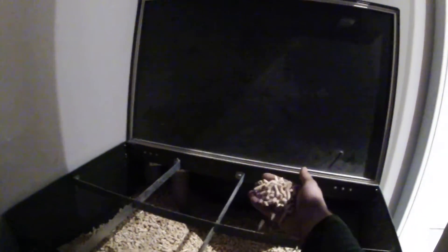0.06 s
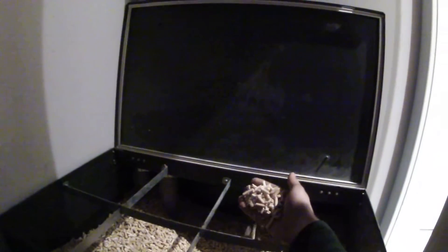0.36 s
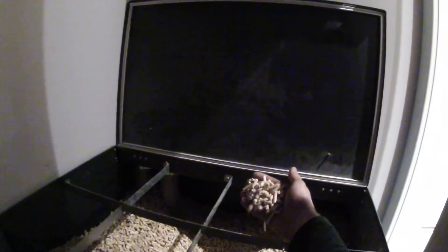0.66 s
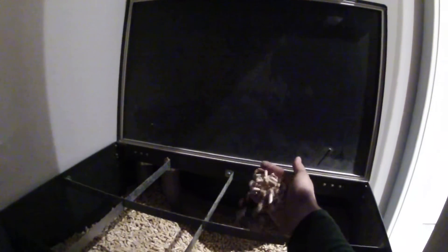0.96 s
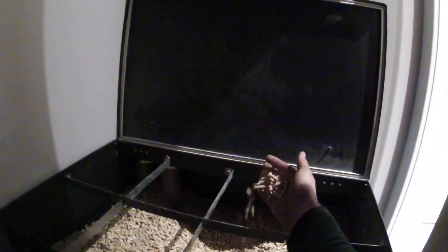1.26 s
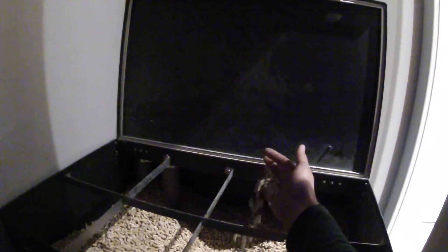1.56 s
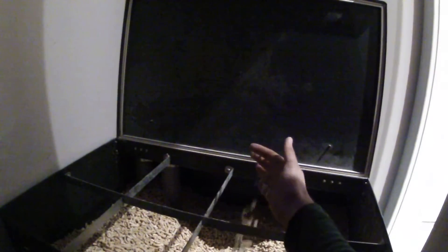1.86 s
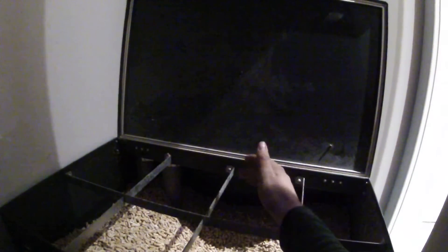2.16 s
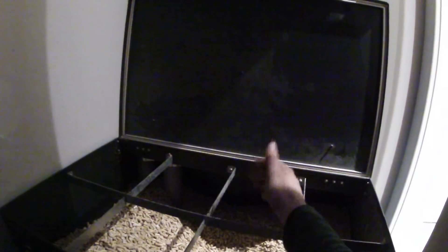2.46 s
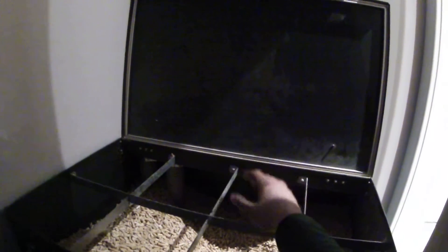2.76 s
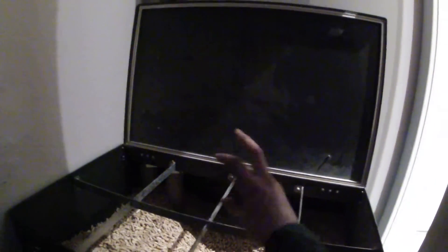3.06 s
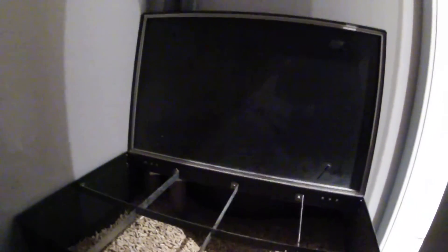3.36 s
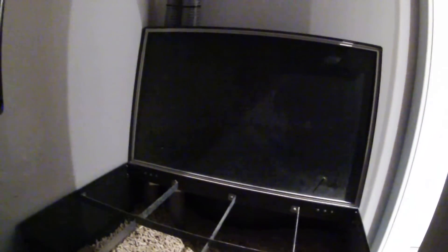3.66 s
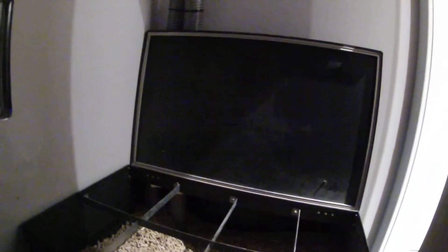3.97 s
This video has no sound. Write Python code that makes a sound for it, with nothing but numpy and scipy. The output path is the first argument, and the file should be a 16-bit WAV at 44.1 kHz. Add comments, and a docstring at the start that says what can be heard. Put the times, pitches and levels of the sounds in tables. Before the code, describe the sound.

Close up in a room, wood pellets drop into a metal hopper with light, bright clicks that thicken and then thin out. Afterwards a sleeve rustles with a soft knock, over dull handling bumps and steady low background noise.

```python
"""At a stove's steel hopper, wood pellets slide off a hand onto the heap: single ones first,
then the whole handful, then stragglers. Each one clicks and bounces among a patter of lighter
pellets, and the steel walls answer with a short bright echo. A sleeve rustles and a soft knock
sounds as the arm withdraws. Underneath are dull handling bumps, a low room rumble, a soft rush,
a faint whine and hiss."""
import sys
import numpy as np
from scipy import signal
from scipy.fft import rfft, irfft
from scipy.io import wavfile

SR = 44100
rng = np.random.default_rng(int(sys.argv[2]) if len(sys.argv) > 2 else 0)


def to_wav(sig):
    """Store sig (one row per channel, or 1-D mono) as 16-bit WAV at the path in sys.argv[1].

    Samples outside -1..1 are clipped; the rate is SR.
    """
    pcm = np.clip(np.atleast_2d(sig), -1, 1) * 32767
    pcm = np.round(pcm).astype(np.int16)
    wavfile.write(sys.argv[1], SR, pcm.T)  # frames by channels


N = 176400
T = np.arange(N) / SR

# The room's rumble over time. Each row: time in seconds, level in dB.
RUMBLE_LEVELS = [(0, -51), (0.2, -58.5), (0.9, -57.5), (1.25, -56), (1.55, -60), (1.8, -52.5), (2.1, -54.5),
                 (2.3, -58), (3.0, -62), (3.45, -58.5), (3.56, -53.5), (3.7, -55.5), (4, -57.5)]
# The rumble's tone. Each row: frequency in Hz, gain in dB.
RUMBLE_COLOUR = [(20, -4), (45, 5), (70, -1.5), (115, -1.5), (165, -7), (230, -5), (330, -11), (500, -19),
                 (800, -41), (2000, -44.5)]
# The whine's swells. Each row: time in seconds, level in dB relative to its loudest.
WHINE_LEVELS = [(0, -12), (0.27, 0), (0.8, -3), (1.5, 0), (1.7, -16), (3.05, -36), (3.15, -0.5),
                (3.22, -35)]
# The whine's resonances. Each row: frequency in Hz, half-width in Hz, gain in dB.
WHINE_PEAKS = [(1090, 54, -12.5), (1440, 30, -8), (1700, 32, 0.5)]
# The soft rush over time. Each row: time in seconds, relative level in dB.
RUSH_LEVELS = [(0, -62), (0.76, -63), (0.79, -52.5), (0.825, -63.5), (1.15, -62), (1.36, -57), (1.65, -64),
               (1.8, -63.5), (2.15, -69), (2.4, -78.5)]
# The tones of the rush and the hiss. Each row: frequency in Hz, gain in dB.
RUSH_COLOUR = [(200, -4), (600, -5), (1000, 0.5), (1900, -2), (2400, -10), (4000, -16), (12000, -30.5)]
HISS_COLOUR = [(600, -20), (800, -5.5), (2390, -5.5), (10500, -8.5), (12500, -3), (15000, -11)]
# Pellets hitting the heap. Each row: start in seconds, relative level in dB, ring pitch in Hz,
# brightness in dB per octave.
LANDINGS = [(0.027, -41.5, 10800, 1.5), (0.118, -50, 13300, -0.5), (0.175, -50.5, 7400, -1),
            (0.19, -49, 10200, 1.5), (0.3269, -50.5, 6600, -3.0), (0.3651, -40.5, 8600, 0),
            (0.403, -52.5, 7200, -3.5), (0.4366, -45.5, 12400, 0.5), (0.5392, -47.5, 12400, 1),
            (0.5795, -47.5, 11500, 0.0), (0.598, -48.5, 11500, 0), (0.612, -47.5, 11400, -1),
            (0.643, -42, 7540, 0.5), (0.6655, -44, 11300, 0.5), (0.7347, -47.3, 7000, 2.5),
            (0.85, -48, 10400, -1), (0.9981, -39.5, 7200, 1), (1.052, -44.5, 12900, 1.5),
            (1.085, -41.5, 3440, 2), (1.116, -47.5, 8300, 1), (1.146, -48, 7600, -3),
            (1.167, -43, 12400, -1), (1.2055, -47, 10300, -0.5), (1.228, -41.5, 3350, -3),
            (1.2703, -49, 8000, -3), (1.2765, -43, 12000, -1.5), (1.286, -43.5, 10000, 1),
            (1.3, -40.5, 11000, 1.5), (1.3335, -41, 7100, 4), (1.3499, -42, 7450, -2),
            (1.3875, -43, 4460, 1), (1.4354, -46.5, 9000, -3), (1.461, -41.5, 11200, 0.5),
            (1.4688, -42.5, 4100, 1.5), (1.5031, -46, 12900, 3), (1.541, -44.5, 6110, -1.5),
            (1.596, -47.5, 11400, -2), (1.627, -47.5, 8400, 1), (1.6814, -43.5, 8300, 0),
            (1.696, -44, 11000, 2), (1.72, -40, 6200, 0), (1.742, -43.5, 5860, -2.5), (1.759, -40, 9500, 3),
            (1.7697, -44, 12000, -1), (1.8312, -47, 12900, 0.5), (1.8533, -37, 9300, -0.5),
            (1.8922, -38.5, 12100, -0.5), (1.9093, -47, 12400, -1.5), (1.95, -42, 4200, 2),
            (1.963, -47.5, 4300, -1), (1.9917, -40.5, 9000, 1), (2.0092, -45.5, 6900, -3),
            (2.0364, -43, 3600, 0), (2.049, -43, 4100, 3.5), (2.0595, -47.5, 4480, -3),
            (2.0851, -42.5, 4100, 5), (2.093, -45.5, 9100, -3), (2.129, -45.5, 9800, -1.5),
            (2.136, -43.5, 10040, 0), (2.143, -47.5, 11000, 0), (2.219, -49.5, 10900, -3.5),
            (2.2532, -50.5, 8050, -4), (2.274, -46.5, 4970, -1.5), (2.3238, -40, 9100, -2),
            (2.4855, -48.5, 5200, -2.5)]
# The flow of lighter pellets. Each row: time in seconds, relative level in dB.
PATTER_LEVELS = [(0.1, -71), (0.5, -73), (0.56, -62), (0.62, -64), (0.72, -79), (0.98, -68.5), (1.1, -58.5),
                 (1.25, -57), (1.31, -48.5), (1.42, -53.5), (1.53, -54), (1.65, -55.5), (1.76, -47),
                 (1.81, -54), (1.97, -54), (2.05, -52.5), (2.18, -60.5), (2.27, -59), (2.31, -80)]
# The tone of all pellet clicks. Each row: frequency in Hz, gain in dB.
CLICK_COLOUR = [(60, -14), (160, -1.5), (260, -8), (500, -15), (1000, -11.5), (2000, -6), (3500, -1.5),
                (6000, -2.5), (8000, -1), (12000, 3), (15000, -0.5)]
# Handling bumps. Each row: middle in seconds, relative level in dB.
BUMPS = [(0.107, -48.5), (0.266, -56.5), (0.501, -55.5), (0.627, -48), (0.707, -50), (0.983, -53.5),
         (1.074, -55), (1.21, -53.5), (1.29, -53.5), (1.367, -53.5), (1.458, -54.5), (1.567, -51.5),
         (1.637, -52), (1.693, -53.5), (1.95, -49), (2.041, -48.5), (2.162, -48.5), (2.235, -54),
         (2.352, -52.5), (2.5, -52.5), (2.613, -57), (2.717, -56.5), (2.928, -54), (3.323, -54.5),
         (3.401, -53), (3.55, -52.5), (3.61, -50.5), (3.715, -53), (3.803, -56)]
# The tones of the handling bumps and ticks. Each row: frequency in Hz, gain in dB.
BUMP_COLOUR = [(30, -8), (70, -2.5), (120, 2.5), (170, -4), (230, -5), (330, -14.5), (600, -24), (900, -30),
               (2000, -51.5)]
TICK_COLOUR = [(100, -13), (380, 1.5), (700, 0), (1000, -17), (2500, -38.5)]
# The sleeve's rustle. Each row: time in seconds, level in dB.
RUSTLE_LEVELS = [(3.05, -70), (3.24, -62.5), (3.33, -65.5), (3.48, -60.5), (3.61, -57), (3.68, -59.5),
                 (3.77, -59.5), (3.98, -63.5)]
# Brief brushes of the sleeve. Each row: middle in seconds, width in seconds, relative level in dB.
BRUSHES = [(3.24, 0.037, -57), (3.62, 0.21, -62.5)]
# The tones of the rustle and the brushes. Each row: frequency in Hz, gain in dB.
RUSTLE_COLOUR = [(100, -12), (300, -5), (700, -1.5), (1900, -5), (2600, -13.5), (6000, -20), (15000, -11)]
BRUSH_COLOUR = [(500, -17), (2000, 2.5), (5000, -2.5), (10000, -1), (15000, -10)]
# The knock's ringing tones. Each row: pitch in Hz, relative level in dB, seconds to fade by 60 dB.
KNOCK_TONES = [(1020, 1.5, 0.053), (1290, -2, 0.043), (1390, 10, 0.021), (1560, -2, .04), (1825, -5, .04),
               (2090, -0.5, 0.036)]


def undb(db):
    """Turn decibels into a gain."""
    return 10 ** (np.asarray(db) / 20)


def unit(x):
    """Scale to an average (rms) level of 1."""
    return x / np.sqrt(np.mean(x ** 2))


def unit_energy(x):
    """Scale each channel to an energy of 1."""
    return x / np.sqrt(np.sum(x ** 2, axis=-1, keepdims=True))


def curve(rows):
    """A gain over time that joins (seconds, dB) points."""
    return undb(np.interp(T, *np.array(rows).T))


def swell(at_s, width_s):
    """A bell-shaped rise and fall around one moment."""
    return np.exp(-.5 * ((T - at_s) / width_s) ** 2)


def colour(x, points):
    """Shape a sound's tone with a filter that follows (Hz, dB) points."""
    hz, db = np.array(points).T
    size = 2 * N
    freqs = np.maximum(np.fft.rfftfreq(size, 1 / SR), 1)
    gains = undb(np.interp(np.log(freqs), np.log(hz), db))
    cepstrum = irfft(np.log(gains))
    cepstrum[1:N] *= 2  # folded so the filter rings after a click, never before it
    cepstrum[N + 1:] = 0
    return irfft(rfft(x, size) * np.exp(rfft(cepstrum)))[..., :N]


def noise(points, side_db):
    """Stereo noise with the given tone; a higher side_db sounds wider."""
    mid, side = rng.standard_normal((2, N))
    return unit(colour(mid + undb(side_db) * side * np.array([[1], [-1]]), points))


def add(track, at_s, sound):
    """Mix a short sound into a track."""
    start = int(np.clip(at_s * SR, 0, track.shape[-1] - 1))
    part = sound[..., :track.shape[-1] - start]
    track[..., start:start + part.shape[-1]] += part


def room(whine_db=-69.5, hiss_db=-60.5):
    """A low rumble, a thin whine of noise in narrow resonances, a midrange rush and even hiss."""
    rumble = noise(RUMBLE_COLOUR, side_db=-7.5) * curve(RUMBLE_LEVELS)
    freqs = np.fft.rfftfreq(N, 1 / SR)
    peaks = sum(undb(db) / (1 + ((freqs - hz) / width) ** 2) for hz, width, db in WHINE_PEAKS)
    whine = unit(irfft(rfft(rng.standard_normal(N)) * peaks, N))
    whine *= curve(WHINE_LEVELS) * undb(whine_db)
    rush = noise(RUSH_COLOUR, side_db=-6) * curve(RUSH_LEVELS) * undb([[-1.5], [1]])
    hiss = noise(HISS_COLOUR, side_db=1) * undb(hiss_db)
    return rumble + whine + rush + hiss


def click(ring_hz, crack_s=0.00018, ring_cycles=8, long_pellet_hz=3300):
    """A pellet cracks and rings; long pellets ring lower, longer and louder than short ones."""
    t = T[:900]
    crack = unit_energy(rng.standard_normal(len(t)) * np.exp(-t / crack_s))
    ring = unit_energy(np.sin(2 * np.pi * ring_hz * t) * np.exp(-t * ring_hz / ring_cycles))
    ring_db = -8.5 - 5 * np.log2(ring_hz / long_pellet_hz)
    return crack + undb(ring_db) * ring


def landings(bounces=4, gap_s=0.003, fade_s=0.013, pitch_spread=0.045, gain_db=25):
    """Each pellet strikes the heap and bounces a few times as its energy dies away."""
    out = np.zeros((2, N))
    size = 2048
    octaves = np.log2(np.clip(np.fft.rfftfreq(size, 1 / SR), 1500, 15000) / 8000)
    for at_s, db, ring_hz, brightness in LANDINGS:
        hit = click(ring_hz)
        hit = np.pad(hit, (0, size - len(hit)))
        for delay in np.cumsum(gap_s * rng.uniform(.3, 1.7, bounces)):
            bounce = click(ring_hz * (1 + pitch_spread * rng.uniform(-1, 1)))
            bounce_db = -2.5 + 2 * rng.standard_normal()
            add(hit, delay, bounce * undb(bounce_db) * np.exp(-delay / fade_s))
        tilt = np.roll(irfft(undb(brightness * octaves)), 20)[:40]  # brightens or dulls this pellet
        hit = np.convolve(unit_energy(hit), tilt)
        add(out, at_s, hopper_echo(hit) * undb(db + gain_db))
    return out


def hopper_echo(x, early_fade_s=0.0064, tail_s=0.17):
    """Sound comes straight from the right, then off the steel walls: sparse echoes and a smooth tail."""
    t = T[:10000]
    early = rng.standard_normal((2, len(t))) ** 3  # cubing makes a few spikes stand out
    early = unit_energy(early * np.exp(-t / early_fade_s) * (1 - np.exp(-t / 0.00054)))
    tail = rng.standard_normal((2, len(t))) * undb(-60 * t / tail_s)
    tail = unit_energy(tail * (1 - np.exp(-t / 0.0043)))
    response = (early + undb(-1) * tail) * undb([[-6.5], [0]])  # left, right
    response[:, 0] += undb([-22.5, 0])  # the direct sound
    return signal.fftconvolve(x[None], response, axes=1)[:, :N]


def patter(spots=10, clicks_per_s=480, spread_db=4):
    """Lighter pellets click at random on several spots of the heap, louder as the flow grows."""
    out = np.zeros((2, N))
    slot_s = spots / clicks_per_s
    for _ in range(spots):
        clicks = np.zeros(N)
        for start_s in np.arange(0, PATTER_LEVELS[-1][0], slot_s):
            at_s = start_s + rng.uniform(0, slot_s)
            ring_hz = rng.uniform(3586, 13230)
            add(clicks, at_s, click(ring_hz) * undb(spread_db * rng.standard_normal()))
        out += hopper_echo(clicks * curve(PATTER_LEVELS))
    return out * np.sqrt(SR / clicks_per_s) * undb(-0.5)


def handling_bumps(width_s=0.017):
    """Handling makes soft thumps: short swells of low noise."""
    swells = sum(undb(db - 1) * swell(at_s, width_s) for at_s, db in BUMPS)
    return noise(BUMP_COLOUR, side_db=-12.5) * swells


def handling_ticks(ticks_per_s=40, level_db=-68.5):
    """Faint dull ticks come at random, stronger when the rumble swells."""
    is_tick = rng.random(N) < ticks_per_s / SR
    strength = rng.uniform(0.47, 1, N) * curve(RUMBLE_LEVELS)
    return unit(colour(is_tick * strength, TICK_COLOUR)) * undb(level_db)


def sleeve():
    """Cloth rustles and brushes softly as the arm is drawn back."""
    rustle = noise(RUSTLE_COLOUR, side_db=-11) * curve(RUSTLE_LEVELS)
    swells = sum(undb(db) * swell(at_s, width_s) for at_s, width_s, db in BRUSHES)
    brushes = noise(BRUSH_COLOUR, side_db=4) * swells * undb([[-2.5], [1.5]])
    return rustle + brushes


def knock(at_s=3.244, gain_db=-46, rise_s=0.0027):
    """A soft contact sets a few short hollow tones ringing."""
    t = np.maximum(T - at_s, 0)
    ring = sum(undb(db - 60 * t / fade_s) * np.sin(2 * np.pi * hz * t) for hz, db, fade_s in KNOCK_TONES)
    return undb(gain_db) * ring * (1 - np.exp(-t / rise_s)) * undb([[-3], [0]])


def scene():
    """Mix the pellets, the room, the handling and the withdrawing arm."""
    pellets = colour(landings() + patter(), CLICK_COLOUR)
    return pellets + room() + handling_bumps() + handling_ticks() + sleeve() + knock()


def record(dry):
    """Cut the highest treble and shift the whole wave by a constant, silent offset."""
    top_hz, offset = 15400, -0.1255
    lowpass = signal.ellip(10, .2, 70, top_hz, fs=SR, output="sos")
    return signal.sosfilt(lowpass, dry) + offset


dry = scene()
out = record(dry)
to_wav(out)
```